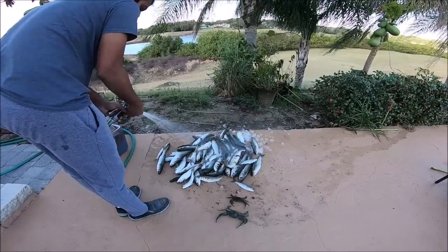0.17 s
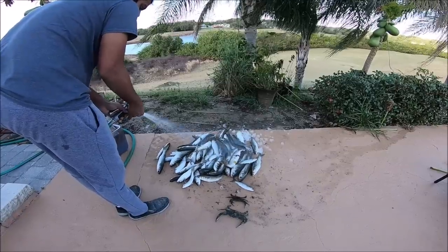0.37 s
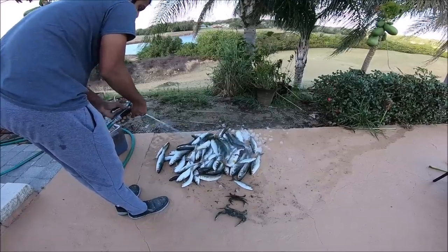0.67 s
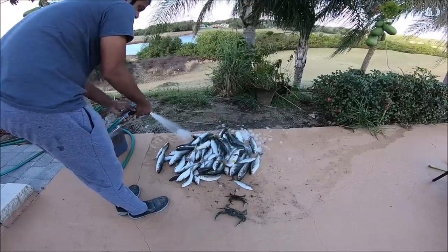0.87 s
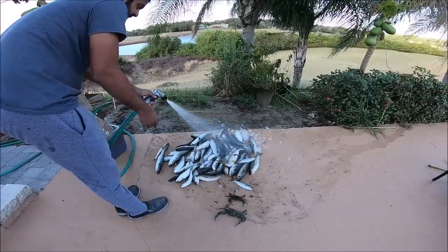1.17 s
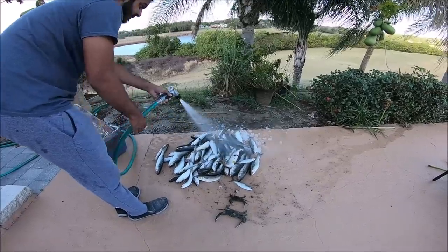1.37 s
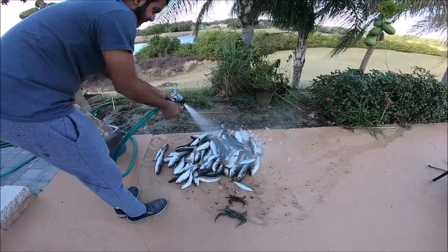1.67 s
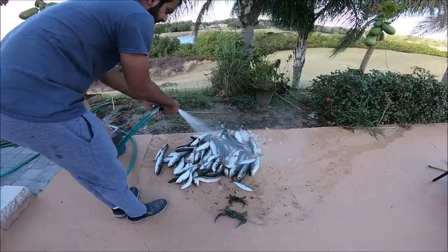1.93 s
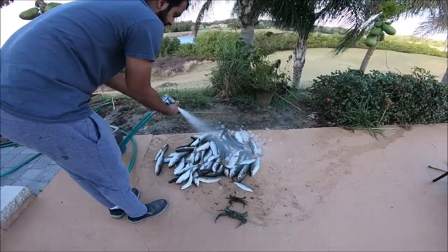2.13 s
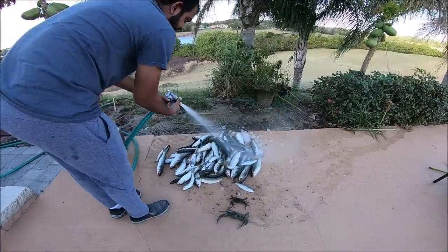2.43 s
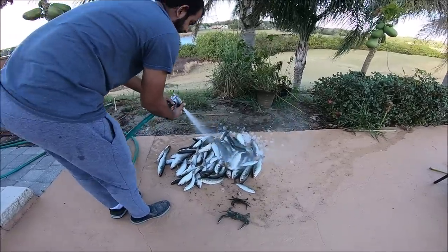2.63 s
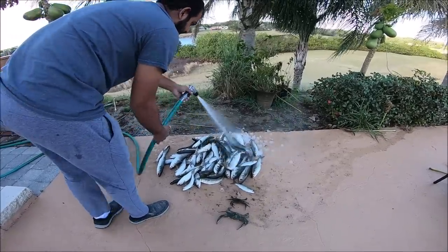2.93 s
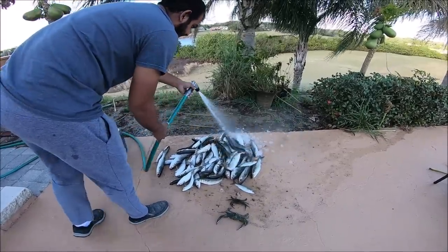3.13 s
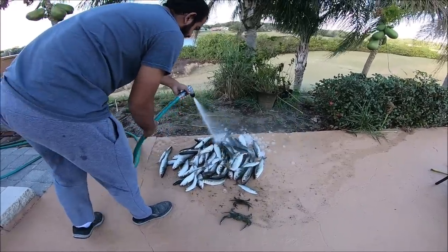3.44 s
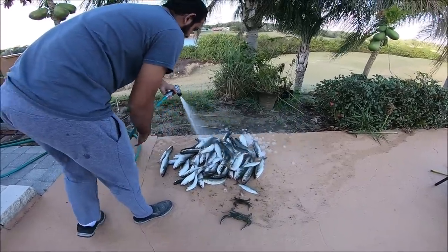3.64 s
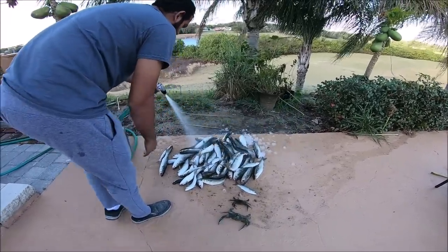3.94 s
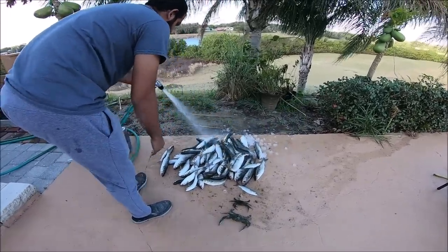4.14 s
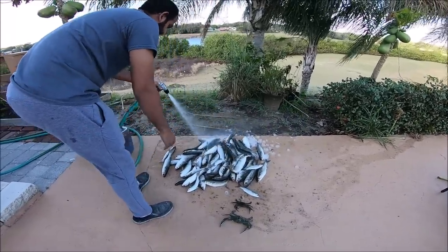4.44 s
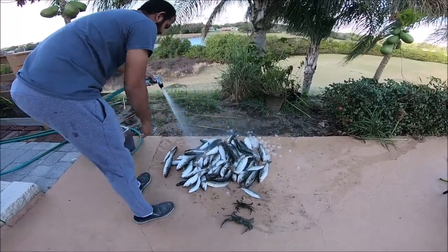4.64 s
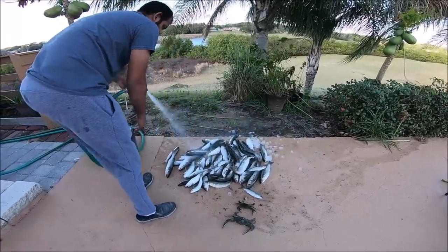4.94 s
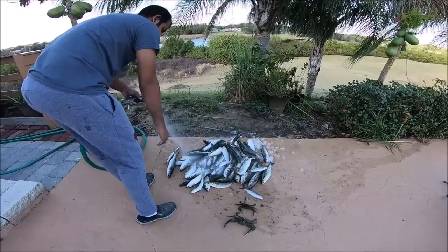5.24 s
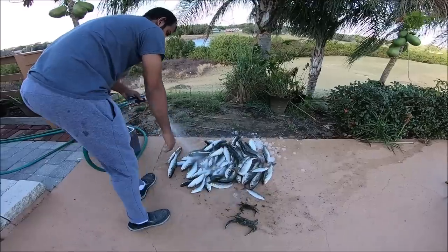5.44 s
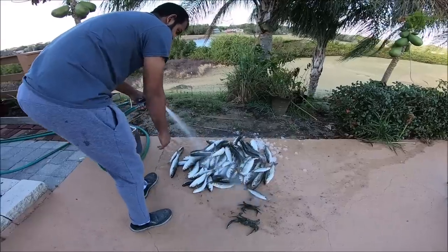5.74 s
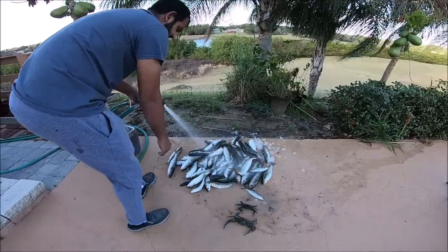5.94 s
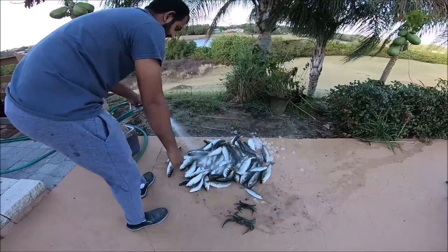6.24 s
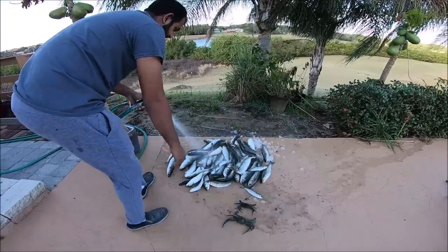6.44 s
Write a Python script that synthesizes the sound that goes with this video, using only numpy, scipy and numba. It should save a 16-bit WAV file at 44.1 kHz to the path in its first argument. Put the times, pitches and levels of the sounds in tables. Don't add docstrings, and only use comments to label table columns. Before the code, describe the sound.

Outdoors, a hose jet plays on a heap of wet fish on concrete, heard from a few metres away through a wind-exposed camera microphone, nearly mono. From 0 to 0.8 seconds it is a moderate airy hiss with fine patter and small bubbly plops. Around 0.82 to 0.86 a tiny nasal rubber squeak and tick mark the valve closing; the spray drains into a gap with faint spitting clicks. At about 0.97 it sputters back, breaking into full flow near 1.1. From there the hiss is continuous and splashy, strongest in the upper mids, its colour wavering as the aim sweeps. From 2 to 5.6 seconds brief hollow, gurgling resonances come and go, with stray drops; the flow swells around 5.6 and turns broader and flatter towards 6.6. Low wind rumbles and flutters throughout, with soft thumps clustering near 2.3, 3.7, 4.5 and 5.5.

```python
import sys
import numpy as np
from scipy import signal
from scipy.fft import rfft, irfft, next_fast_len
from scipy.io import wavfile
from scipy.ndimage import uniform_filter1d
from numba import njit

SR = 44100
rng = np.random.default_rng(int(sys.argv[2]) if len(sys.argv) > 2 else 0)


def store_pcm(level_fs):
    pcm = np.round(np.clip(level_fs, -1, 1) * 32767).astype(np.int16)
    wavfile.write(sys.argv[1], SR, np.atleast_2d(pcm).T)


def volts_from_db(level):
    exponent = np.asarray(level, float) / 20
    return 10 ** exponent


N = 291056
TIME = np.arange(N) / SR
SIZE = next_fast_len(N)
HZ = np.maximum(np.arange(SIZE // 2 + 1) * SR / SIZE, 1)

# time in seconds, flow in dB, aim off the heap onto bare slab in dB,
# depth into the heap in dB.
HAND = [(0, -6.5, 7, -2), (.05, -4.5, 0.5, -7.5), (.45, -5, 1, -2.5), (.62, -5.5, -2, 6),
        (.82, -7.5, 8.5, -0.5), (1.09, -1.5, 6.5, 0.5), (1.5, 0.5, 3.5, 0), (1.75, 0, 0, 2),
        (2.3, -0.5, -1.5, 1.5), (2.7, 1, -4, 1), (3.2, 0.5, 0, -4), (3.65, 1, -2, -1.5),
        (4.0, 2, -4.5, -1.5), (4.9, -1.5, -1.5, 0.5), (5.6, 3.5, -4, 0), (5.8, 1.5, -3.5, 0.5),
        (6.3, 1, 4, 0.5), (6.6, 1, 6, -2.5)]
# time in seconds, length in seconds, level in dB, extra depth in dB.
SWEEPS = [(0.076, 0.034, 1, 5), (0.253, .05, 3, -0.5), (0.338, 0.048, 1.5, -2), (1.287, 0.077, 1, 2.5),
          (2.88, 0.07, -2, 4), (2.963, 0.19, 2.5, 2), (3.09, 0.063, -1.5, 3), (3.664, 0.21, 2, -1),
          (3.896, 0.099, -1.5, 0), (4.027, 0.066, 1, -1), (4.105, 0.099, -4.5, 5), (4.228, 0.083, 4, 0.5),
          (4.372, 0.14, -1, -3.5), (4.595, 0.11, 2, 1.5), (4.69, 0.065, 3, 1.5), (4.995, 0.082, 2.5, 1),
          (5.107, .09, -4, 4.5), (5.272, 0.14, 1, 4), (5.53, 0.073, 4, -3), (5.59, 0.095, -1.5, 6),
          (5.66, 0.073, -3.5, -3.5), (5.713, 0.089, 2.5, -5), (6.11, .08, -3.5, 0), (6.45, 0.15, 2, 2.5)]
# frequency in Hz, share of aim, share of depth,
# share of sweeps, level in dB when the valve is shut.
SPRAY_PARTS = [
    (766, 1, .6, 0.16, -4),
    (1550, 0.24, 0.86, 0.39, -11),
    (3100, .01, 0.011, 0.94, -15),
    (5030, 0.048, .01, 0.96, -11),
    (10700, 0.7, .01, 0.36, -18),
]
# time in seconds, length in seconds, frequency in Hz, level in dB.
HOLLOWS = [(0.254, .05, 2280, 0), (0.653, 0.066, 1900, 0), (1.3, 0.58, 3630, 1.5),
           (1.866, 0.066, 4330, 4.5), (2.056, 0.051, 1500, 5), (2.098, 0.27, 2240, 3.5),
           (2.256, 0.18, 1500, -5), (2.43, 0.1, 1860, 5), (2.61, 0.21, 1800, 4.5), (2.725, 0.24, 2290, 4),
           (2.813, 0.038, 1100, 12), (2.95, 0.13, 2400, 2.5), (3.01, .1, 4300, 3),
           (3.486, 0.054, 2360, 8.5), (3.687, .12, 3140, 3.5), (3.797, 0.13, 1500, -2),
           (3.912, 0.072, 1880, 8), (3.955, 0.091, 2630, -7), (4.005, 0.11, 1520, 9),
           (4.063, .09, 2450, -1.5), (4.21, 0.16, 1960, 8.5), (4.384, 0.12, 2200, -5),
           (4.71, 0.11, 1440, 7), (4.978, 0.29, 1170, 6.5), (5.26, 0.13, 1350, 10), (5.386, 0.04, 1450, 13),
           (5.613, 0.074, 950, 8), (5.935, 0.066, 5200, 3), (6.315, 0.32, 1780, 3.5)]
# frequency in Hz, density in dB per Hz.
JET_COLOUR = [(180, -3), (300, -14), (540, -11.5), (761, -11.5), (1510, -5), (1720, -4), (1960, -2.5),
              (3260, 2), (5860, -8), (8000, -15.5), (8680, -14.5), (10400, -18), (11600, -16),
              (12800, -23.5), (14900, -46)]
# time in seconds, peak in dB, bubble frequency in Hz.
PLOPS = [(0.0761, -26, 3570), (0.1819, -27, 3580), (0.2422, -27, 2350), (0.2554, -29, 3100),
         (0.3375, -28.5, 2250), (0.3894, -31, 3080), (0.6513, -29.5, 1940), (0.7551, -31, 3000),
         (1.0778, -28, 3300), (1.7488, -24, 2880), (1.8311, -26, 3950), (2.2387, -24, 2880),
         (2.6398, -21, 3130), (2.8194, -41, 2760), (3.715, -19.5, 3230), (4.5405, -24.5, 2600),
         (4.7, -21, 1970), (5.1915, -46, 1590), (5.2199, -37, 1510), (5.61, -27, 1990), (6.1478, -30, 3400)]
# time in seconds, pitch in Hz, level in dB, brightness in dB per octave.
SQUEAK = [
    (.818, 678, -58, -3),
    (.826, 684, -42, -2),
    (.839, 682, -42, -1),
    (.845, 692, -43.5, 0),
    (.853, 708, -48, 1.5),
    (.858, 710, -67, -2),
]
# multiple of the pitch, level in dB.
SQUEAK_ORDERS = [(1, -8), (2, 1), (3, -5), (4, -4), (5, -6), (6, -11), (7, -5), (8, -8), (9, -13),
                 (10, -11), (11, -15), (12, -23), (13, -17), (14, -20)]
# time in seconds, peak in dB, frequency in Hz.
SHORT_TICKS = [(.9655, -44, 4300), (.9657, -45, 6200), (.862, -56, 11500), (.875, -52, 11500),
               (.894, -52, 11500), (.906, -58, 11500), (.916, -61, 11500), (.931, -60, 11500),
               (.2432, -35, 3500), (.844, -40, 4900), (.848, -37, 4950)]
# time in seconds, level in dB, tilt in dB per octave.
WIND = [(0, -41.5, -1), (.2, -44, -2.5), (.55, -53.5, -3), (.85, -50, -2.5), (1.2, -43.5, 6.5),
        (1.54, -44.5, -0.5), (1.89, -43, 1.5), (2.2, -37.5, 2), (2.62, -41, -0.5), (3.25, -44, -0.5),
        (3.58, -40.5, 1.5), (3.8, -45, -2), (4.1, -40, -2), (4.36, -46, 1.5), (4.78, -41, -1),
        (5.5, -44, 0.5), (6.15, -53.5, -1.5), (6.6, -47.5, 6)]
# time in seconds, length in seconds, lift in dB, tilt in dB per octave.
GUSTS = [(0.093, 0.073, 0.5, -2.5), (0.303, 0.046, 6.5, 2.5), (0.373, 0.091, 14.5, 1.5),
         (0.54, 0.037, 10.5, 0), (6.59, 0.057, 13, 2), (0.975, 0.065, 7, 3), (5.9, .05, 11.5, -4),
         (1.473, 0.052, 9, -1), (1.658, 0.09, 10, 1.5), (6.221, 0.05, 16, 7), (2.08, 0.11, 9.5, 1),
         (2.157, 0.056, 4, -2), (2.312, 0.072, 7, 4), (2.394, 0.063, 7, 3.5), (2.513, 0.077, 2.5, -1),
         (2.733, 0.044, 11.5, -2.5), (2.96, 0.094, 8.5, 6), (3.107, 0.076, 12.5, 1), (3.455, .1, 9.5, 4),
         (3.562, 0.034, -0.5, -9.5), (3.635, 0.079, 12.5, 5.5), (3.726, 0.09, 14, 5), (3.92, 0.049, 7, -7),
         (4.266, 0.13, 10.5, 0), (4.457, 0.048, 17.5, 3), (4.68, 0.08, 10.5, 1.5), (4.891, 0.066, 8, -0.5),
         (5.14, 0.054, 4, -1), (5.468, 0.053, 12.5, 4.5), (5.552, 0.096, 9.5, 0)]
WIND_PARTS_HZ = [
    45,
    150,
    370,
]
# frequency in Hz, density in dB per Hz.
WIND_COLOUR = [(7.1, -40), (12, -13.5), (43, 4), (70, 0.5), (151, -6), (202, -10), (309, -21.5), (542, -32),
               (700, -38), (910, -41), (1540, -120)]
# time in seconds, peak in dB, frequency in Hz.
THUMPS = [(0.283, -23.5, 131), (0.714, -29.5, 113), (0.954, -33, 134), (0.976, -24.5, 178),
          (1.473, -21.5, 117), (1.639, -30.5, 80.7), (1.804, -35, 129), (2.048, -22, 83), (2.062, -24, 87),
          (2.187, -24, 140), (2.291, -24, 91.5), (2.303, -18.5, 158), (2.331, -23, 135), (2.379, -32, 121),
          (2.759, -28, 80.7), (2.792, -26, 95), (2.944, -23, 156), (3.081, -26, 174), (3.384, -28, 143),
          (3.432, -28, 103), (3.614, -18.5, 148), (3.668, -22, 80.7), (3.701, -22, 118), (3.733, -19.5, 97),
          (4.452, -20, 164), (4.65, -22.5, 88.8), (4.844, -22.5, 120), (5.44, -35, 94.2), (5.451, -20, 84),
          (5.511, -28.5, 96.9)]
# start in seconds, end in seconds.
APART = [(.35, .41), (.96, 1.01), (1.23, 1.3), (1.38, 1.52), (1.6, 1.7), (1.89, 1.96), (2.14, 2.25),
         (2.35, 2.41), (2.7, 2.93), (3.07, 3.14), (3.22, 3.5), (3.6, 3.65), (4.43, 4.5), (4.67, 4.73),
         (4.86, 4.99), (5.23, 5.29), (5.44, 5.51), (6.0, 6.08), (6.57, 6.6)]
# frequency in Hz, density in dB per Hz.
GRAIN_COLOUR = [(59, -39), (100, -5), (227, -9), (316, -5.5), (2460, -5.5), (3630, -10), (4740, -1.5),
                (5470, -4.5), (11900, -9), (13500, -23)]

JET_DB, WIND_DB, GRAIN_DB = -39.5, -37, -66.5
HOLLOW_OCTAVES = .19
VALVE_SHUT_S, DRAIN_S, VALVE_OPEN_S, FULL_FLOW_S = 0.848, 0.1, .965, 1.076
AIR_LOCK = 0.23
GUST_PIVOT_HZ = 150
HOUSING_HZ, HOUSING_WIDTH_HZ, HOUSING_DB = 8730, 270, -10.5


def jet():
    water = rng.standard_normal(N) + volts_from_db(-4.5) * patter(3500)
    water = water + volts_from_db(-11) * fizz(3.5, 2.94, 860, 6260)
    places, curves = hand()
    s, length, hollow_hz, hollow_db = np.transpose(HOLLOWS)
    inside = swells(s, length, power=4)
    surge_db = 0.22 * walk(19) + 0.48 * walk(45)
    aim, spit = walk(28), walk(160)
    out = 0
    for hz, band in bands(water, JET_COLOUR, 350 * 2 ** np.arange(0, 5.6, 1 / 5)):
        aim = 0.71 * aim + 0.17 * walk(22)
        waver_db = surge_db + 1.6 * aim + 0.8 * walk(32)
        mist_db = 1.65 * (hz / 12000) ** 3 * spit
        nearness = np.exp(-(np.log2(hz / hollow_hz) / HOLLOW_OCTAVES) ** 2)
        ring_db = inside @ (hollow_db * nearness)
        hand_db = between(np.log(hz), places, curves, 0.64)
        out = out + band * volts_from_db(hand_db + ring_db + waver_db + mist_db)
    return volts_from_db(JET_DB) * out


def hand():
    s, *controls = np.transpose(HAND)
    flow, aim, depth = (np.interp(TIME, s, c) for c in controls)
    s, length, db, depth_db = np.transpose(SWEEPS)
    inside = swells(s, length, power=2)
    sweep, depth = inside @ db, depth + inside @ depth_db
    hz, *shares = np.transpose(SPRAY_PARTS)
    controls = np.array([aim, depth, sweep, valve()])
    return np.log(hz), swings(flow + np.transpose(shares) @ controls)


def valve():
    draining = np.sqrt(np.clip((TIME - VALVE_SHUT_S) / DRAIN_S, 0, 1))
    refilled = (TIME - VALVE_OPEN_S) / (FULL_FLOW_S - VALVE_OPEN_S)
    shut = np.clip(np.minimum(draining, 1 - (1 - AIR_LOCK) * refilled), 0, 1)
    return shut * (TIME < FULL_FLOW_S)


def patter(per_s):
    hit = rng.random(N) < per_s / SR
    return unit(hit * (2 * rng.random(N) - 1))


def fizz(scatter_db, cycles, low_hz, high_hz):
    when, pitch, length = rng.random((9000, 3)).T
    hz = low_hz * (high_hz / low_hz) ** pitch
    sizes = drop_sizes(scatter_db, count=len(hz)) * np.sqrt(hz / 1000)
    return unit(bubbles((when * N).astype(np.int64), hz, cycles * (.5 + length), sizes, 0.044))


def drop_sizes(scatter_db, count):
    return volts_from_db(scatter_db * np.minimum(rng.exponential(size=count), 4))


@njit
def bubbles(start, hz, cycles, size, glide):
    out = np.zeros(N)
    for k in range(len(start)):
        z, phase, step = size[k], 0., 2 * np.pi * hz[k] / SR
        fade = np.exp(-hz[k] / (cycles[k] * SR))
        for i in range(start[k], min(N, start[k] + int(6 * cycles[k] * SR / hz[k]))):
            out[i] += z * np.sin(phase)
            phase += step
            step *= 1 + glide * (1 - fade)
            z *= fade
    return out


def drops(table, cycles, db):
    s, peak_db, hz = np.transpose(table)
    return bubbles((s * SR).astype(np.int64), hz, cycles + 0 * s, volts_from_db(peak_db + db), 0.0056)


def squeak():
    s, hz, db, bright_db = np.transpose(SQUEAK)
    pitch = np.interp(TIME, s, hz) * (1 + .0007 * walk(300))
    phase = 2 * np.pi * np.cumsum(pitch) / SR
    bright_db = np.interp(TIME, s, bright_db)
    tone = 0
    for k, order_db in SQUEAK_ORDERS:
        level = volts_from_db(order_db + bright_db * np.log2(k / 2) + 0.62 * walk(69.5))
        tone = tone + level * np.sin(k * phase + 2 * np.pi * rng.random())
    return tone * volts_from_db(np.interp(TIME, s, db, left=-200, right=-200))


def wind():
    places, curves = gusts()
    eddies = walk(32)
    out = 0
    for hz, band in bands(rng.standard_normal(N), WIND_COLOUR, 20 * 2 ** np.arange(0, 5.1, .5)):
        burst_db = min(hz / 170, 1.4) * 2.3 * eddies + 1.1 * walk(20)
        gust_db = between(np.log(hz), places, curves, 0.69)
        out = out + steadied(band, 0.083, share=0.33) * volts_from_db(gust_db + burst_db)
    return volts_from_db(WIND_DB) * out + thumps()


def gusts():
    s, *controls = np.transpose(WIND)
    slow_db, slow_tilt_db = (np.interp(TIME, s, c) for c in controls)
    s, length, lift_db, tilt_db = np.transpose(GUSTS)
    inside = swells(s, length, power=2)
    octaves = np.log2(np.array(WIND_PARTS_HZ)[:, None] / GUST_PIVOT_HZ)
    tilted_db = octaves * (slow_tilt_db + inside @ tilt_db)
    return np.log(WIND_PARTS_HZ), swings(slow_db + inside @ lift_db + tilted_db)


def thumps():
    out = np.zeros(N)
    for s, peak_db, hz in THUMPS:
        turn = (TIME - s) * hz - .6
        wave = np.cos(2 * np.pi * turn + np.pi + 1.15 * rng.standard_normal())
        swing = np.exp(-(turn / 0.67) ** 2) * wave
        trough = .35 * np.exp(-(turn / .12) ** 2)
        out += volts_from_db(peak_db - 3.5) * (swing - trough)
    return out


def steadied(x, seconds, share):
    window = int(seconds * SR)
    power = uniform_filter1d(uniform_filter1d(x ** 2, window), window)
    slow = np.sqrt(power / np.mean(x ** 2))
    return x / (slow + 0.11) ** share


def unit(x):
    return x / np.sqrt(np.mean(x ** 2))


def walk(rate):
    k = int(SR / rate)
    held = np.repeat(rng.standard_normal(N // k + 1), k)
    return unit(uniform_filter1d(uniform_filter1d(held, k), k)[:N])


def swells(s, length, power):
    return np.exp(-(2 * (TIME[:, None] - s) / length) ** power)


def swings(curves):
    return curves - 10 * np.log10(np.mean(volts_from_db(2 * curves), axis=1, keepdims=True))


def bands(x, colour, centres):
    hz, db = np.transpose(colour)
    spectrum = rfft(x, SIZE) * volts_from_db(np.interp(np.log(HZ), np.log(hz), db))
    scale = 1 / np.std(irfft(spectrum, SIZE))
    place = np.interp(np.log(HZ), np.log(centres), np.arange(len(centres)))
    for k, centre in enumerate(centres):
        window = np.cos(np.pi / 2 * np.clip(place - k, -1, 1)) ** 2
        yield centre, scale * irfft(spectrum * window, SIZE)[:N]


def between(at, places, curves, beyond):
    k = int(np.clip(np.searchsorted(places, at) - 1, 0, len(places) - 2))
    share = np.clip((at - places[k]) / (places[k + 1] - places[k]), 0, beyond)
    return curves[k] + share * (curves[k + 1] - curves[k])


def scene():
    close = drops(PLOPS, 9.5, db=-6.5) + squeak() + drops(SHORT_TICKS, 1.8, db=10.0)
    close = signal.sosfilt(signal.butter(6, 12800, fs=SR, output="sos"), close)
    spray = jet()
    port = signal.iirpeak(HOUSING_HZ, HOUSING_HZ / HOUSING_WIDTH_HZ, fs=SR)
    spray = spray + volts_from_db(HOUSING_DB) * signal.lfilter(*port, spray)
    sound = spray + close + wind()
    return np.array([sound, sound])


def low_pass(x):
    return signal.sosfilt(signal.butter(12, 15030, fs=SR, output="sos"), x)


def record(dry):
    moments = sum((TIME > a + .008) * (TIME < b - .008) * 1. for a, b in APART)
    apart = uniform_filter1d(moments, size=500)
    patches = bands(rng.standard_normal(N), GRAIN_COLOUR, 300 * 2 ** np.arange(0, 5.6, .5))
    grain = volts_from_db(GRAIN_DB) * apart * sum(band * volts_from_db(5.2 * walk(20)) for hz, band in patches)
    treble = np.sqrt(uniform_filter1d(np.diff(dry[0], prepend=0) ** 2, size=4000))
    grain = grain * treble / np.std(np.diff(dry[0]))
    return low_pass(dry + np.array([grain, -grain]))


dry = scene()
out = record(dry)
store_pcm(out)
```